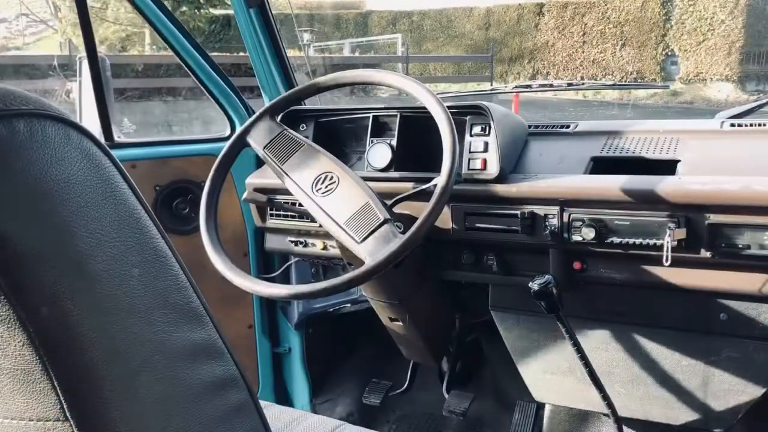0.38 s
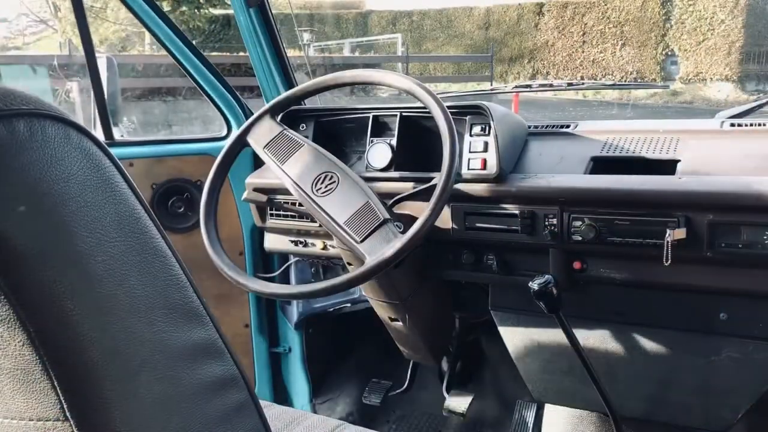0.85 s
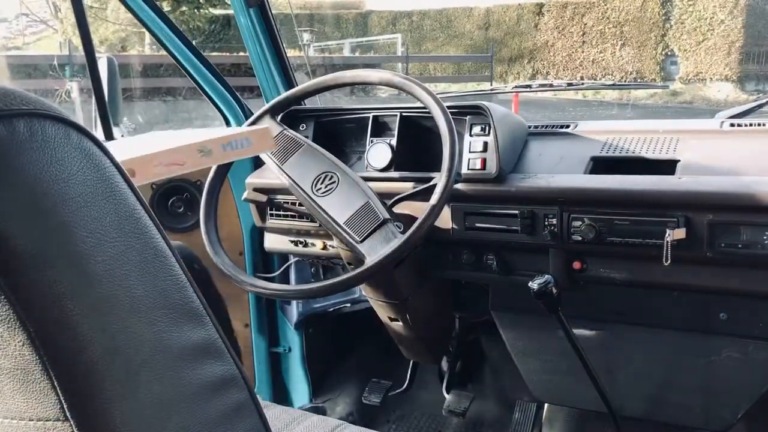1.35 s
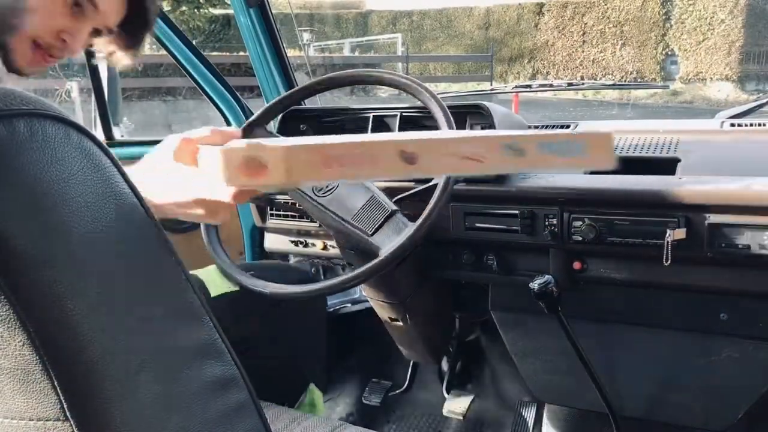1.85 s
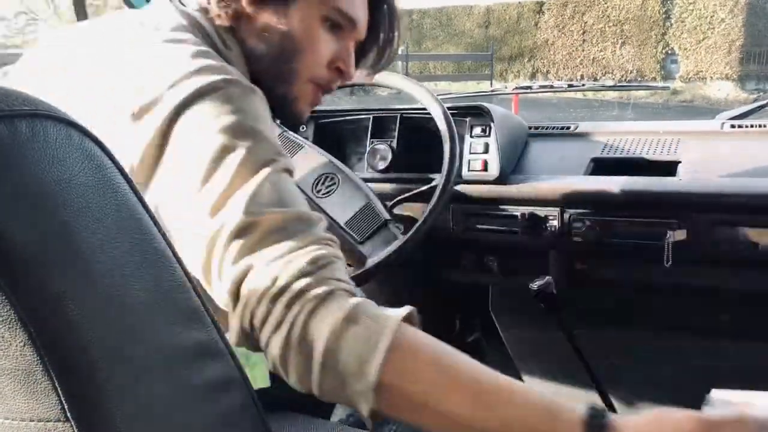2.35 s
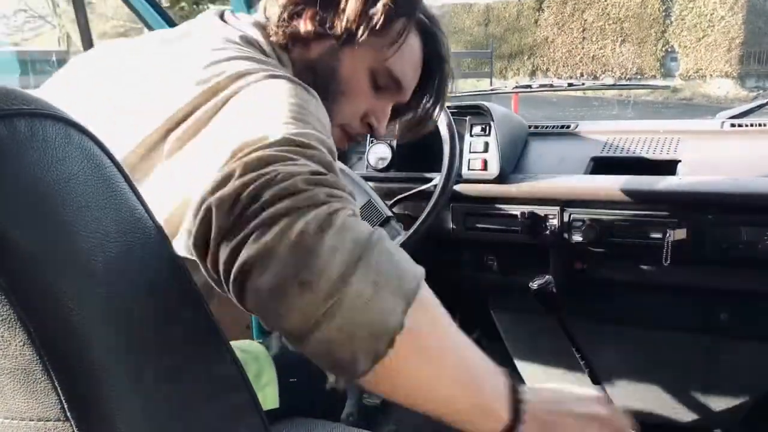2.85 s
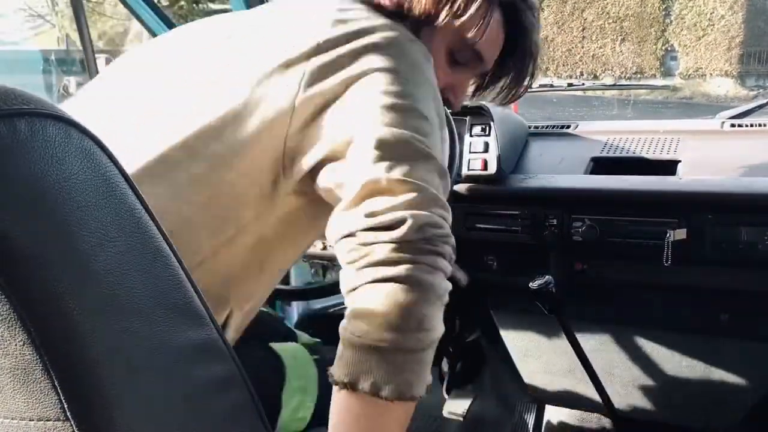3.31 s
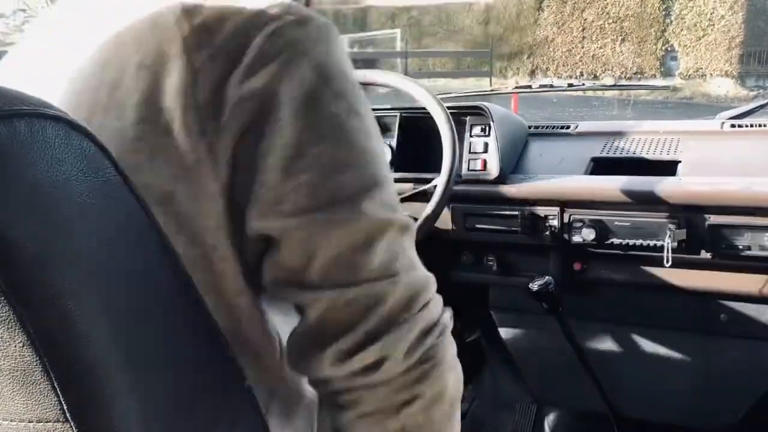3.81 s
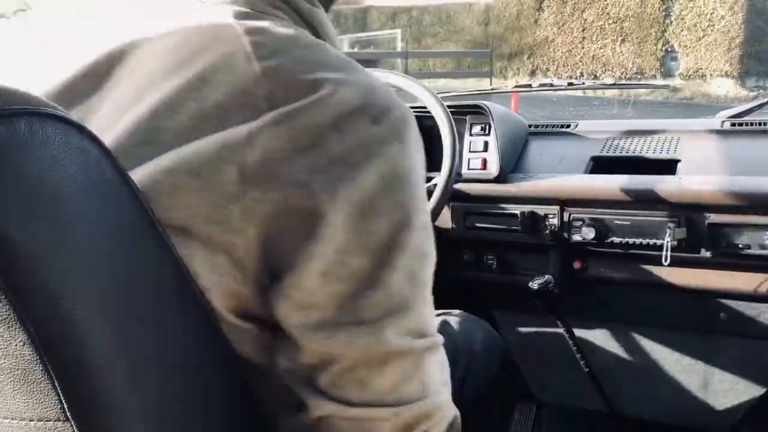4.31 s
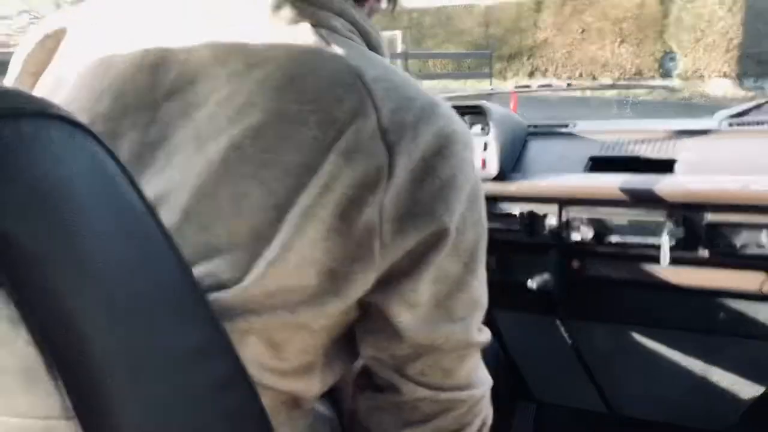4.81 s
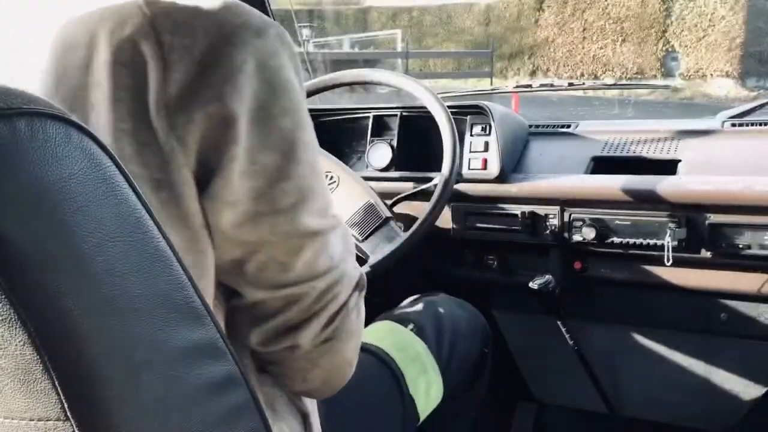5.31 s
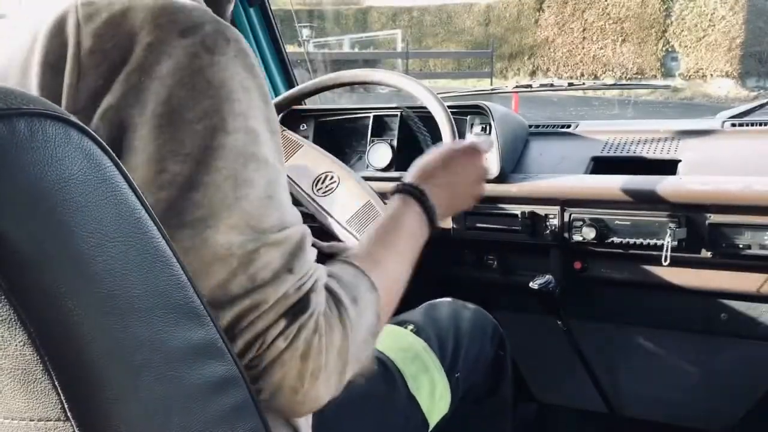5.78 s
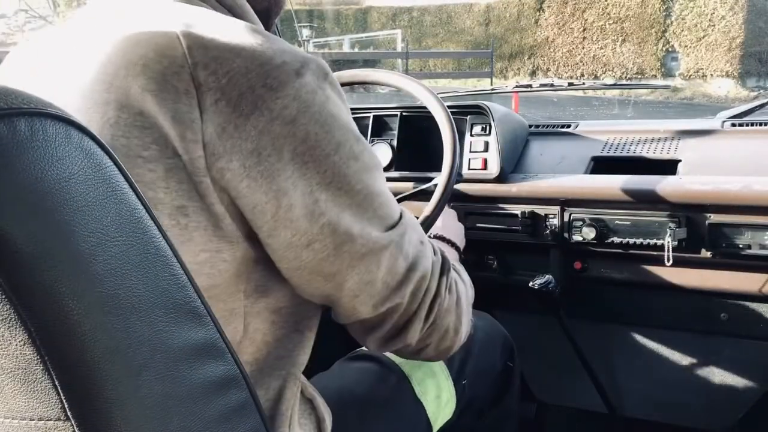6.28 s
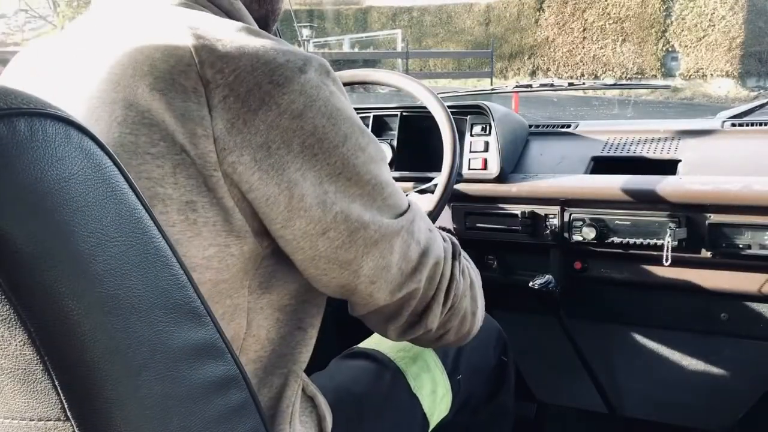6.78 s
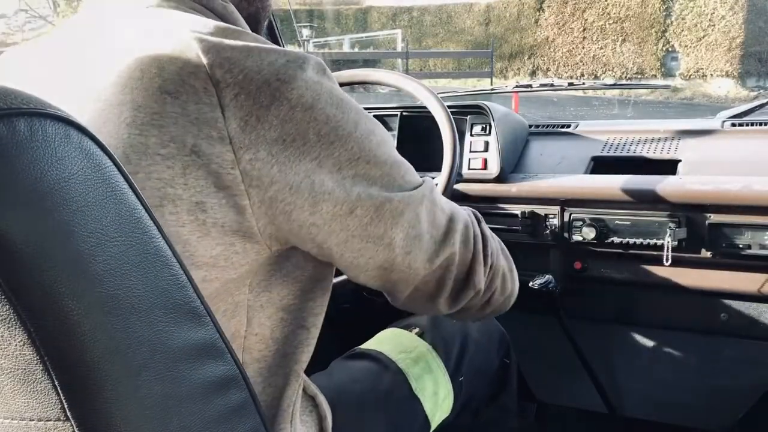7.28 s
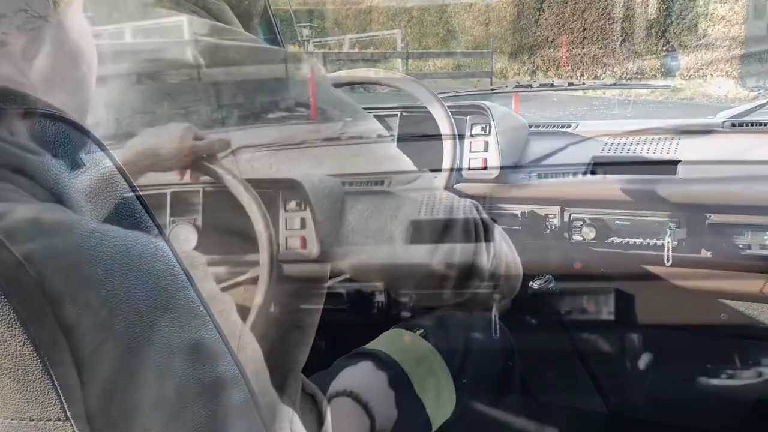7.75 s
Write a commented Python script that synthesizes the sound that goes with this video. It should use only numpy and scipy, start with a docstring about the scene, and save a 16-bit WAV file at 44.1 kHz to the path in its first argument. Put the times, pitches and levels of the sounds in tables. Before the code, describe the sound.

Close, dry cab sound behind the driver's seat: light ticks and low floor bumps, a burst of box scuffs and hollow knocks, then clothing rustle and heavy body shifting. Sharp high metal chirps precede a short hinge whine and a loud, boomy door slam, by far the loudest event. Afterwards one dull knock, then faint metallic key ticks and a light jingle, with the engine off.

```python
"""Inside a parked van, door open: a cardboard box slides and squeaks onto the seat, someone climbs in,
a metal part chirps, the hinge whines and the door slams. Then keys tick at the lock in the shut cab.
Rustle and body boom are shaped noise; taps and keys are noise scrapes; thumps and door are damped modes;
chirps and squeals are gliding tones. Sound events ring in a short noise tail; the floor fades at the end."""
import sys
import numpy as np
from scipy import signal
from scipy.fft import rfft, irfft, next_fast_len
from scipy.io import wavfile
from scipy.ndimage import uniform_filter1d, map_coordinates

SR = 44100
rng = np.random.default_rng(int(sys.argv[2]) if len(sys.argv) > 2 else 0)


def unload_wav(signal):
    """Save mono or channel-first audio to the path in sys.argv[1] as 16-bit WAV at rate SR, clipped to [-1, 1]."""
    wavfile.write(
        sys.argv[1],
        SR,
        np.round(np.clip(np.atleast_2d(signal).T, -1, 1) * 32767).astype(np.int16),
    )


def undo_db(level):
    """Turn decibels back into plain size, where 20 dB means ten times bigger."""
    steps = np.asarray(level, float) / 20
    return 10 ** steps


N = 358515

# still air of the cab: freq_hz, density_db
FLOOR_SPECTRUM = [(18, -40.5), (30, -6.5), (70, 1), (127, 6.5), (273, -4.5), (394, -9.5), (684, -13),
                  (760, -12.5), (2230, -24.5), (14800, -28.5), (16000, -28.5)]
# floor level: time_s, level_db
FLOOR_LEVEL = [(0, -75.5), (7.95, -70.5), (8.13, -84.5)]

# rustle spectra, low to high: freq_hz, density_db
BOOM_SPECTRUM = [(12, -45.5), (20, -19), (49, -4.5), (64, 2.5), (86, -8), (113, 0.5), (124, 1.5),
                 (188, -13), (214, -11.5), (260, -9), (340, -34.5), (570, -120)]
SEAT_SPECTRUM = [(94, -36), (160, 0), (189, -7.5), (259, 1), (301, -4.5), (340, 2), (513, -6), (810, -8),
                 (1300, -19), (1690, -44.5), (2860, -120)]
SCUFF_SPECTRUM = [(590, -29.5), (1000, -2), (1410, -1.5), (1830, -3.5), (2540, -7), (2990, -5),
                  (4500, -13.5), (5850, -43.5), (9900, -120)]
HISS_SPECTRUM = [(2350, -28), (4000, -2.5), (5500, -1), (7840, -4.5), (13500, -6), (15100, -5.5),
                 (16000, -9.5)]
# weight shifting on floor and seat: time_s, effort_db
WEIGHT_EFFORT = [(0, -62.5), (.9, -64.5), (1.03, -52), (1.28, -62.5), (1.4, -66.5), (1.75, -52),
                 (2.05, -57), (2.16, -62.5), (2.71, -50.5), (2.94, -58), (3.03, -45.5), (3.5, -45),
                 (3.76, -43.5), (4.13, -40.5), (4.25, -53.5), (4.55, -48), (4.66, -49.5), (5.72, -58.5),
                 (5.89, -51.5), (6.12, -64), (6.24, -55.5), (6.51, -69.5), (6.63, -61.5), (7.15, -66.5),
                 (7.38, -52.5), (7.67, -58), (7.86, -54.5), (8, -62), (8.13, -78)]
# cloth, box and hands rubbing: time_s, effort_db, crispness_db
RUB_EFFORT = [(.2, -71.5, -3), (.37, -60, -6.5), (.51, -67, -3.5), (.68, -62.5, 0), (.85, -62.5, 1),
              (.95, -52.5, 0), (1.09, -58.5, 4.5), (1.34, -66.5, 3.5), (1.48, -67.5, 0.5),
              (1.55, -64.5, 2.5), (1.65, -63, 5.5), (1.73, -60.5, 2.5), (2.05, -64.5, 0), (2.16, -59, -4),
              (2.3, -57.5, 15.5), (2.41, -53, -10.5), (2.57, -55.5, -2), (2.71, -55.5, -8),
              (3.03, -59.5, -8), (3.16, -56, -5), (3.32, -53.5, -0.5), (3.4, -54.5, -5), (3.51, -64, -0.5),
              (3.76, -57, -1), (3.94, -60.5, -5), (4.2, -66.5, -2), (4.55, -61.5, -4), (4.68, -76, 3),
              (4.95, -60.5, -5.5), (5.076, -71, -1), (5.26, -62, -4), (5.38, -61, -2.5), (5.48, -60, -3.5),
              (5.57, -73, 5.5), (5.72, -74.5, -1), (6, -69.5, 0), (6.12, -78, 4), (6.3, -74.5, 0.5),
              (6.63, -72, -13.5), (6.9, -75.5, -0.5), (7.2, -78.5, 1), (7.3, -71.5, 6), (7.4, -74, 1),
              (7.67, -71.5, -5), (7.86, -67, -8), (8, -80, -14)]
SEAT_DB, SEAT_SHARE_OF_WEIGHT = 2, .4  # seat level over the blend of weight and rub
# body shaken by the slam, rows boom, seat, scuff, hiss: peak_db, fall_db_per_s
SHUDDER_LAYERS = [(-28.5, 33.5), (-34.5, 92), (-52.5, 94), (-61.5, 99.5)]
SHUDDER_PEAK_S, SHUDDER_RISE_DB_PER_S = 4.89, 150

# cab tail decay: freq_hz, t60_s
CAB_DECAY = [(100, 0.32), (500, 0.34), (2000, 0.21), (6000, 0.23), (15000, .2)]

# taps, ticks and scuffs: start_s, level_db, heaviness_db, crispness_db, contact_s
TAP_EVENTS = [(.1466, -54, 2, -10, 0.0054), (.3022, -49, -6.5, -6.5, 0.0071), (.3284, -48, -9, -32, 0.017),
              (.4224, -53, -7, -17, 0.028), (.8764, -44, -6, 0, 0.006), (.95, -51.5, 8.5, -2, 0.015),
              (1.4894, -58, 13, -23, 0.009), (1.5055, -44.5, 13.5, -37, 0.005),
              (1.714, -43, 1.5, -10, 0.0056), (1.948, -52, 5, -25, .0049),
              (2.1038, -30.5, -16.5, -13.5, 0.0081), (2.167, -31, -10, -11, 0.0084),
              (2.1837, -24, -35, -14, 0.0045), (2.2018, -36, -28, -20, .0058),
              (2.2335, -38, -25, -4, 0.011), (2.2598, -31, -22, -9, 0.0073),
              (2.2894, -43.5, -1.5, -7, 0.061), (2.4219, -44.5, -0.5, -6, 0.032),
              (2.4877, -35, -6, -10, 0.0024), (2.5925, -32.5, -6, -9, 0.014),
              (2.6394, -41, -4.5, -6.5, 0.033), (2.6868, -27, -3.5, 2.5, 0.0033),
              (2.7193, -35.5, -8, -45, 0.005), (2.7494, -60, 17, -17, 0.01), (2.9052, -39, -13, -9, 0.01),
              (2.9198, -39, -8, -11, 0.013), (2.9589, -42, 0, -3.5, 0.0093), (3.1123, -31, 1, -13, 0.0034),
              (3.3925, -42.5, -10, -24, 0.014), (3.4194, -44.5, -5, -20, 0.01),
              (3.4367, -41.5, 1.5, -29, 0.011), (3.4698, -44, 2, -15, 0.0046),
              (3.529, -46, 5.5, -14.5, 0.005), (3.9144, -48, -1, -25, 0.0098),
              (4.0229, -51.5, 16.5, -6, 0.0077), (4.069, -46.5, -13, -15, 0.007),
              (4.0894, -50, 3, -14, 0.007), (4.124, -48, -16, 14.5, 0.0041),
              (4.6146, -40.5, -8.5, -19, 0.0086), (5.0534, -47.5, -5, -29, 0.0056),
              (5.5494, -54.5, -14, 4, 0.0055), (5.7603, -56.5, 15, -2, 0.0078),
              (5.8147, -49, -4, -17, 0.0039), (5.9353, -52, -1.5, 0, .0074),
              (5.9995, -54.5, 1.5, -13, 0.012), (6.1794, -55, 3, -13, .009),
              (6.389, -57.5, -5, -11, 0.0069)]
# weight and knocks on floor, seat, box and trim: start_s, level_db, pitch_hz
THUMP_EVENTS = [(.891, -30, 82), (0.93, -35, 99), (0.955, -35, 960), (.969, -28.5, 74), (1.047, -40, 100),
                (1.494, -48, 1100), (1.507, -47, 745), (1.514, -33, 125), (1.706, -34.5, 122.5),
                (1.85, -38, 121.6), (2.592, -40, 540), (2.659, -40, 382), (2.673, -26, 575),
                (2.687, -21.5, 224), (2.691, -21, 1023), (2.704, -22, 413), (2.707, -33, 297),
                (2.718, -27.5, 114.5), (2.739, -33, 618), (2.977, -35, 124.6), (3.111, -31, 450),
                (3.672, -28.5, 191.4), (3.69, -35, 403), (3.859, -36, 386), (3.925, -27, 187),
                (3.947, -31, 255), (4.021, -28.5, 463), (4.119, -28.5, 129), (4.539, -34, 125),
                (5.763, -36, 500), (5.769, -21, 129), (7.26, -38, 178), (7.262, -35, 726),
                (7.291, -36, 343), (7.298, -34, 700), (7.303, -36, 97.3), (7.33, -33, 130),
                (7.436, -37, 783), (7.594, -46, 705)]
THUMP_T60_AT_120_HZ_S, THUMP_T60_POWER = .13, -.45  # power of pitch / 120 Hz

# stick-slip squeals of box and hinge, one list each: time_s, pitch_hz, level_db
SQUEAL_GLIDES = [
    [(2.18, 1964, -52), (2.198, 3200, -50), (2.205, 3970, -38), (2.21, 4000, -60)],
    [(2.229, 2620, -68), (2.236, 2475, -42.5), (2.25, 1890, -44.5), (2.265, 1622, -48), (2.3, 1500, -46),
     (2.325, 1700, -58)],
    [(2.31, 442, -64), (2.32, 434, -40.5), (2.36, 440, -52)],
    [(2.897, 3070, -57), (2.914, 2764, -45.5), (2.935, 3220, -49)],
    [(4.61, 1290, -54), (4.62, 1250, -46), (4.646, 1300, -57), (4.654, 1272, -40.5), (4.69, 1260, -43.5)],
]
# voice of each squeal: overtone_tilt_db per partial, pitch_jitter (ratio before smoothing)
SQUEAL_VOICES = [(-11, .11), (-4.5, 0.23), (-20, 0.12), (-4.5, 0.48), (-24.5, .2)]
# slips of a small metal part: start_s, level_db, pitch_hz, length_s
CHIRP_EVENTS = [(3.667, -16, 6620, 0.0086), (3.699, -30, 7100, 0.0035), (3.733, -24, 6660, 0.009),
                (3.75, -32, 6550, 0.0096)]

# keys and lock: start_s, level_db, heaviness_db, crispness_db, contact_s
KEY_EVENTS = [(6.4608, -49, 3, 5, 0.0024), (6.4994, -58, -5, -15, 0.004), (6.572, -55, 6.5, -20, 0.0067),
              (6.5844, -58.5, 7.5, 4, .003), (6.6284, -44.5, -3, 6, 0.0018), (6.6967, -55, 4.5, 4, 0.0036),
              (6.7591, -43.5, -1, -13.5, 0.0042), (6.9024, -49, -3.5, -23, 0.0029),
              (7.238, -58, 8, -20, 0.007), (7.2575, -43.5, 0, 4, 0.0039), (7.2744, -43, 1.5, -25, 0.0092),
              (7.2917, -46, 4, -21, 0.0075), (7.31, -54, 6.5, -17, 0.01), (7.4377, -63, 20.5, -15, 0.0063),
              (7.4904, -53.5, -10, -6, 0.0047), (7.575, -57, 2.5, -18, 0.0084),
              (7.5911, -50, 7, -25, 0.0054), (7.639, -51, 2, -18, 0.0026), (7.672, -49, 3.5, -24, 0.0044),
              (7.7114, -54, -1, -4, 0.0049), (7.7492, -57.5, 9, -10, 0.0051),
              (7.8932, -40, -11, -11, 0.003), (7.9252, -40.5, 0, 4, 0.0032), (7.955, -58, 0, -9.5, 0.02)]
# steering column, lock and key modes: freq_hz, width_hz, gain_db
COLUMN_MODES = [(195, 60, 2), (710, 50, 8), (1075, 110, 1.5), (1700, 200, 0.5), (3200, 360, 4.5),
                (4020, 105, 2), (6980, 220, -1.5), (8370, 190, -12), (9960, 270, 0.5), (11600, 207, -4),
                (12860, 230, 8.5), (15450, 300, 9.5)]
# key bunch handled: start_s, end_s, level_db
JINGLE_SPANS = [(6.584, 6.662, -64.5), (7.587, 7.86, -63.5)]
JINGLE_EDGE_DB_PER_S = 280

# latch meets striker: start_s, level_db, heaviness_db, crispness_db, contact_s
LATCH_EVENTS = [(4.6881, -8.5, -9.5, -13, .0082), (4.6976, -8, -8.5, -16.5, .012)]
# door panel blows and rebounds: start_s, level_db, hardness_db_per_octave
PANEL_BLOWS = [(4.716, -22.5, 3), (4.743, -21, 4.5), (4.765, -11, -3.5), (4.784, -16.5, -2),
               (4.798, -14.5, -4), (4.825, -27.5, 4), (4.85, -22.5, -2), (4.891, -22, -5), (4.94, -30.5, 0),
               (4.979, -29, -3)]
# door panel and cab air: freq_hz, level_db, t60_s
PANEL_MODES = [(53.4, -6.5, 0.2), (62, 4, 0.16), (100, 2, 0.095), (122, -3.5, 0.49), (178, -7, 0.39),
               (196, -1.5, 0.22), (239.3, 3.5, 0.14), (330, 0, 0.2), (393.7, -5, 0.51), (551, -7.5, 0.18),
               (635, -8, 0.14), (865, -11, 0.12), (1100, -15.5, 0.18), (1533, -23.5, .5), (2020, -41.5, .8)]
RATTLE_START_S, RATTLE_FIRST_GAP_S, RATTLE_GAP_RATIO, RATTLE_HOLD_S = 4.7144, .0155, 1.1, .029
RATTLE_DB, RATTLE_FALL_DB_PER_S, RATTLE_DULLS_DB_PER_S = -13.5, 200.5, 90.5

# last treble lost on the microphone path: freq_hz, gain_db
MIC_RESPONSE = [(15700, 0), (16000, -23)]


def unit(x):
    """Scale to rms 1."""
    return x / np.sqrt(np.mean(x ** 2) + 1e-20)


def along(points, hz):
    """Interpolate (hz, value) points on a log axis."""
    f, v = np.transpose(points)
    return np.interp(np.log(hz + 1), np.log(f + 1), v)


def filtered(x, points):
    """Colour x by (hz, db) points."""
    m = next_fast_len(len(x) + 4096)
    gain = undo_db(along(points, np.fft.rfftfreq(m, 1 / SR)))
    return irfft(rfft(x, m) * gain, m)[:len(x)]


def wobble(knots_per_s):
    """Smooth random curve."""
    knots = rng.standard_normal(int(N * knots_per_s / SR) + 4)
    return map_coordinates(knots, [np.arange(N) * knots_per_s / SR])


def curves(rows):
    """One value per sample for each column after the time."""
    s, *cols = np.transpose(rows)
    return [np.interp(np.arange(N) / SR, s, c) for c in cols]


def add(track, start_s, sound):
    """Mix a sound in at start_s."""
    part = track[max(round(start_s * SR), 0):][:len(sound)]
    part += sound[:len(part)]


def in_cab(x, wet_db):
    """Direct sound plus a fresh noise tail with frequency-dependent decay."""
    hz, t, z = signal.stft(rng.standard_normal(SR // 2), SR, nperseg=256)
    decay = undo_db(-60 * t / along(CAB_DECAY, hz)[:, None])
    tail = signal.istft(z * decay, SR, nperseg=256)[1]
    tail *= undo_db(wet_db) / np.linalg.norm(tail)
    tail[0] = 1  # direct sound
    return signal.fftconvolve(x, tail)


def ringing(x, modes):
    """Resonant body: set the gain of x around each mode."""
    for hz, width_hz, gain_db in modes:
        b, a = signal.iirpeak(hz, hz / width_hz, SR)
        x = x + (undo_db(gain_db) - 1) * signal.lfilter(b, a, x)
    return x


def floor():
    """Faint air and far traffic: shaped noise on a slow level curve."""
    level_db, = curves(FLOOR_LEVEL)
    return undo_db(level_db) * unit(filtered(rng.standard_normal(N), FLOOR_SPECTRUM))


def rustle(spectrum, grain_db, knots_per_s, depth_db):
    """Friction noise: uneven fibre grains and a restless level, at rms 1."""
    grain = uniform_filter1d(rng.exponential(size=N) ** 2, size=40)
    grainy = rng.standard_normal(N) * undo_db(grain_db * grain)
    return unit(filtered(grainy, spectrum) * undo_db(depth_db * wobble(knots_per_s)))


def moves():
    """Weight booms in the body, rubbing scuffs and hisses, the seat follows both; the slam shakes all."""
    weight_db, = curves(WEIGHT_EFFORT)
    rub_db, crisp_db = curves(RUB_EFFORT)
    seat_db = SEAT_DB + SEAT_SHARE_OF_WEIGHT * weight_db + (1 - SEAT_SHARE_OF_WEIGHT) * rub_db
    levels_db = [weight_db, seat_db, rub_db, rub_db + crisp_db]
    layers = [rustle(BOOM_SPECTRUM, grain_db=-1, knots_per_s=15, depth_db=-3.2),
              rustle(SEAT_SPECTRUM, grain_db=1.2, knots_per_s=25, depth_db=1.5),
              rustle(SCUFF_SPECTRUM, grain_db=1.5, knots_per_s=30, depth_db=1.3),
              rustle(HISS_SPECTRUM, grain_db=1.5, knots_per_s=30, depth_db=.9)]
    after_s = np.arange(N) / SR - SHUDDER_PEAK_S
    latched = after_s > LATCH_EVENTS[0][0] - SHUDDER_PEAK_S
    out = np.zeros(N)
    for level_db, layer, (peak_db, fall) in zip(levels_db, layers, SHUDDER_LAYERS):
        shake = undo_db(peak_db + np.minimum(SHUDDER_RISE_DB_PER_S * after_s, -fall * after_s)) * latched
        out += np.hypot(undo_db(level_db), shake) * layer
    return out


def contacts(rows, wet_db, body=()):
    """Each contact is a gritty decaying scrape of its own colour; longer ones start softer."""
    out, t = np.zeros(N), np.arange(SR // 8) / SR
    for start_s, level_db, mid_db, top_db, contact_s in rows:
        # the crispest ticks keep only the top
        high_db = 0.55 * min(top_db, 3) - 1.1 * max(top_db - 2.5, 0) - 4.0
        colour = [(150, mid_db + 6.5), (500, mid_db + 11.5), (1400, mid_db + 7.0),
                  (3000, 1.0 + 0.28 * mid_db), (4500, -2.2 - 0.14 * mid_db), (7500, high_db + 4.5),
                  (10500, (high_db + top_db) / 2 + 1.5), (14000, top_db + 1.0)]
        life_s = np.clip(contact_s, .001, .06)
        roughness = uniform_filter1d(rng.standard_normal(len(t)), size=30) * np.sqrt(30)
        grit = rng.standard_normal(len(t)) * undo_db(3 * roughness)
        envelope = np.exp(-t / life_s) * (1 - np.exp(-t / (0.37 * life_s)))
        scrape = filtered(grit, colour) * envelope
        add(out, start_s, undo_db(level_db + 4) * in_cab(ringing(scrape, body), wet_db))
    return out


def thumps():
    """Blows ring a surface at one pitch, with a weaker neighbour mode; high ones die sooner."""
    out, t = np.zeros(N), np.arange(SR // 3) / SR
    for start_s, level_db, hz in THUMP_EVENTS:
        t60_s = THUMP_T60_AT_120_HZ_S * (hz / 120) ** THUMP_T60_POWER
        neighbour = np.sin(2 * np.pi * hz * rng.uniform(1.3, 2.4) * t)
        ring = np.sin(2 * np.pi * hz * t) + .4 * undo_db(-40 * t / t60_s) * neighbour
        envelope = undo_db(-60 * t / t60_s) * (1 - np.exp(-t / 0.0022))
        add(out, start_s, undo_db(level_db) * in_cab(ring * envelope, wet_db=-7.5))
    return out


def squeals():
    """Stick-slip: gliding tones with overtones and an unsteady pitch."""
    out = np.zeros(N)
    for rows, (tilt_db, jitter) in zip(SQUEAL_GLIDES, SQUEAL_VOICES):
        s, hz, level_db = np.transpose(rows)
        t = np.arange(s[0], s[-1], 1 / SR)
        shake = 1 + jitter * uniform_filter1d(rng.standard_normal(len(t)), size=60)
        phase = 2 * np.pi * np.cumsum(np.interp(t, s, hz) * shake) / SR
        tone = sum(undo_db(k * tilt_db - 2.7 * k * (k - 2.5)) * np.sin((k + 1) * phase) for k in range(4))
        level = np.sqrt(2) * undo_db(np.interp(t, s, level_db))
        add(out, s[0], in_cab(level * tone, wet_db=-7.5))
    return out


def chirps():
    """Metal slips: very short rough squeaks with an octave, left ringing in the cab."""
    out = np.zeros(N)
    for start_s, level_db, hz, length_s in CHIRP_EVENTS:
        t = np.arange(round(length_s * SR)) / SR
        roughness = np.cumsum(uniform_filter1d(rng.standard_normal(len(t)), size=50)) * .08
        phase = 2 * np.pi * hz * t + roughness
        tone = np.sin(phase) + 0.37 * np.sin(2 * phase)
        envelope = np.sin(np.pi * t / length_s) ** 0.27
        add(out, start_s, undo_db(level_db) * in_cab(tone * envelope, wet_db=-1.0))
    return out


def jingle():
    """Many faint random key touches, ringing the same modes as the key taps."""
    touched = rng.random(N) < 900 / SR  # 900 touches a second on average
    touches = rng.standard_normal(N) * rng.exponential(size=N) ** .5 * touched
    colour = [(300, -20.0), (800, 8.5), (1700, 7), (2800, -9), (5000, -10.5), (11500, -12),
              (13000, -19.5), (16000, -18)]
    bunch = ringing(filtered(touches, colour), COLUMN_MODES)
    t = np.arange(N) / SR
    handled = np.zeros(N)
    for start_s, end_s, level_db in JINGLE_SPANS:
        outside_s = np.maximum(np.maximum(start_s - t, t - end_s), 0)
        handled += undo_db(level_db - JINGLE_EDGE_DB_PER_S * outside_s)
    return in_cab(handled * unit(bunch), wet_db=-2.5)[:N]


def keys():
    """Key and lock contacts ring the steering column, plus the handled bunch."""
    return contacts(KEY_EVENTS, wet_db=-0.3, body=COLUMN_MODES) + jingle()


def rattle(count):
    """Door and glass in the frame: contacts ever further apart, heavier, duller; weaker after a hold."""
    late_s = RATTLE_FIRST_GAP_S * (RATTLE_GAP_RATIO ** np.arange(count) - 1) / (RATTLE_GAP_RATIO - 1)
    rows = []
    for d in late_s:
        level_db = RATTLE_DB - RATTLE_FALL_DB_PER_S * max(d - RATTLE_HOLD_S, 0)
        rows.append((RATTLE_START_S + d, level_db, 3 + 22 * d, -6 - RATTLE_DULLS_DB_PER_S * d, .01))
    return rows


def door():
    """Latch and rattle over blows that ring panel and cab air; harder blows wake higher modes."""
    out = contacts(LATCH_EVENTS + rattle(count=11), wet_db=-1.0)
    t = np.arange(SR // 2) / SR
    for start_s, level_db, hardness_db in PANEL_BLOWS:
        scatter_db = rng.normal(0, 2.5, len(PANEL_MODES))
        ring = np.zeros(len(t))
        for (hz, mode_db, t60_s), more_db in zip(PANEL_MODES, scatter_db):
            struck_db = mode_db + more_db + hardness_db * np.log2(hz / 120)
            cycles = hz * rng.normal(1, 0.024) * t + .25 * rng.random()
            ring += undo_db(struck_db - 60 * t / t60_s) * np.sin(2 * np.pi * cycles)
        onset = 1 - np.exp(-t / .005)
        add(out, start_s, undo_db(level_db - 4.0) * in_cab(ring * onset, wet_db=-8.0))
    return out


def scene():
    """All sources at one microphone."""
    background = floor() + moves()
    hits = contacts(TAP_EVENTS, wet_db=1.5) + thumps() + keys() + door()
    return (background + squeals() + chirps() + hits)[None]


def low_pass(x):
    """Removes everything above the highest recorded frequency."""
    return signal.sosfilt(signal.butter(12, 16640, fs=SR, output="sos"), x)


def record(dry):
    """Treble limit, then a soft squeeze of loud peaks."""
    x = filtered(dry[0], MIC_RESPONSE)[None]
    ceiling, knee = .95, 3.5
    mix = x / (1 + np.abs(x / ceiling) ** knee) ** (1 / knee)
    return low_pass(mix)


dry = scene()
out = record(dry)
unload_wav(out)
```